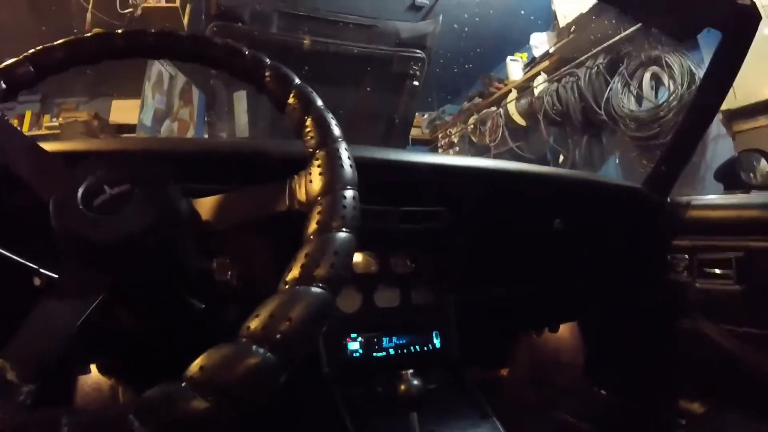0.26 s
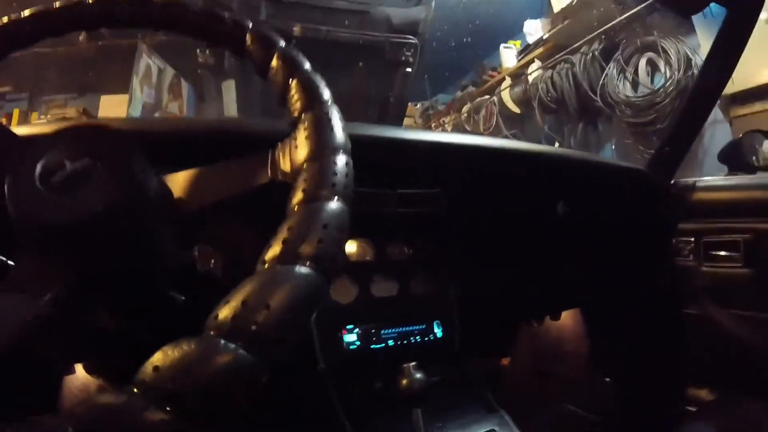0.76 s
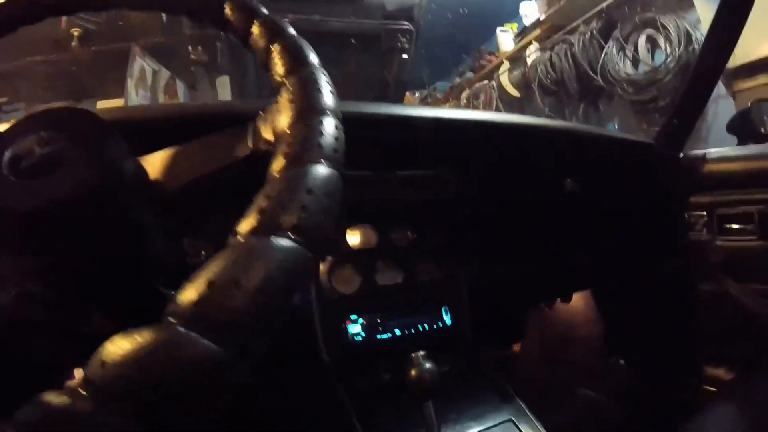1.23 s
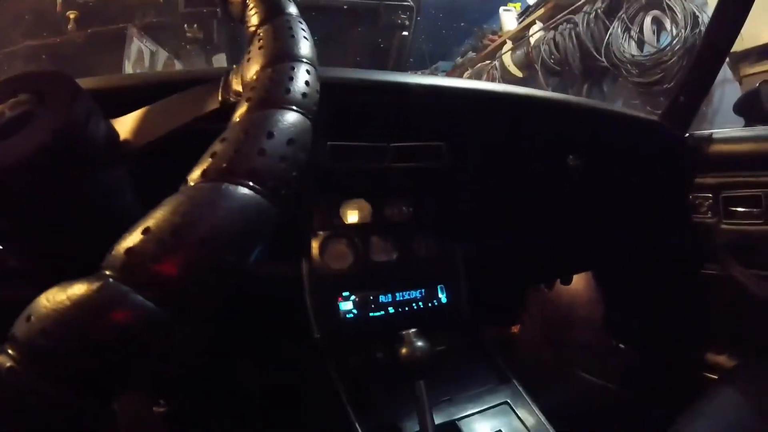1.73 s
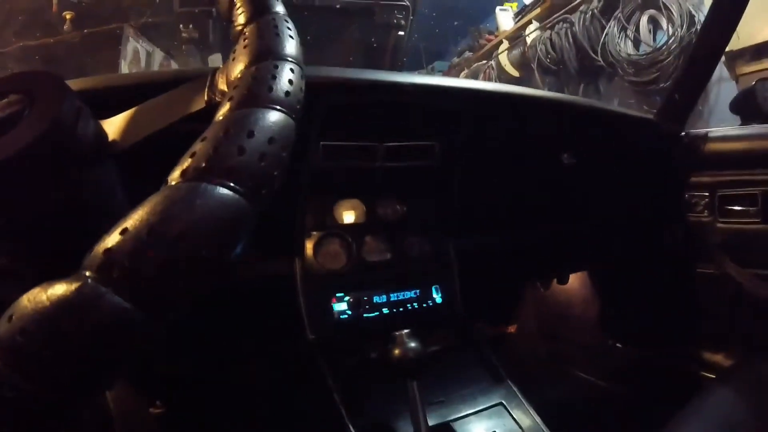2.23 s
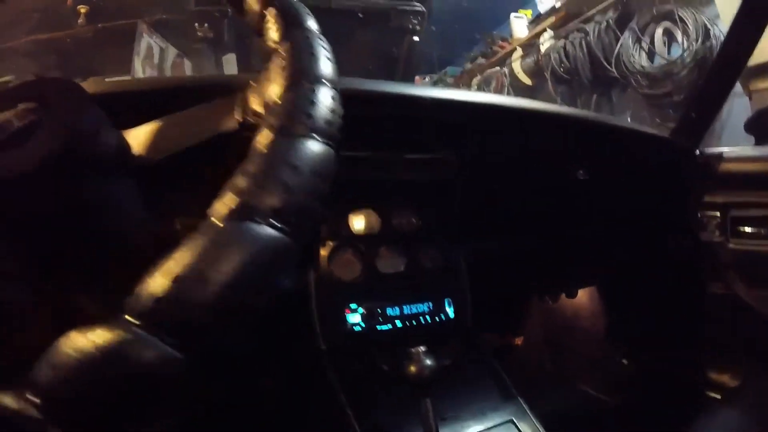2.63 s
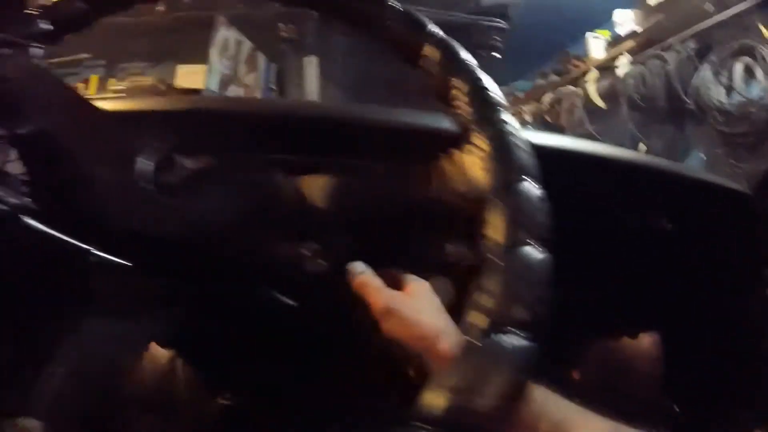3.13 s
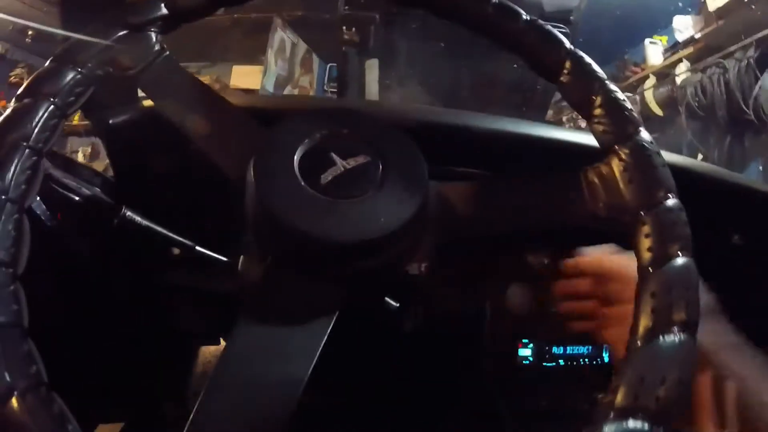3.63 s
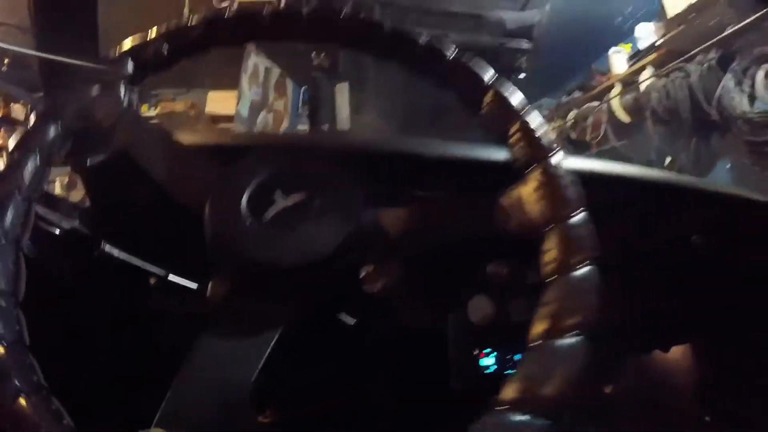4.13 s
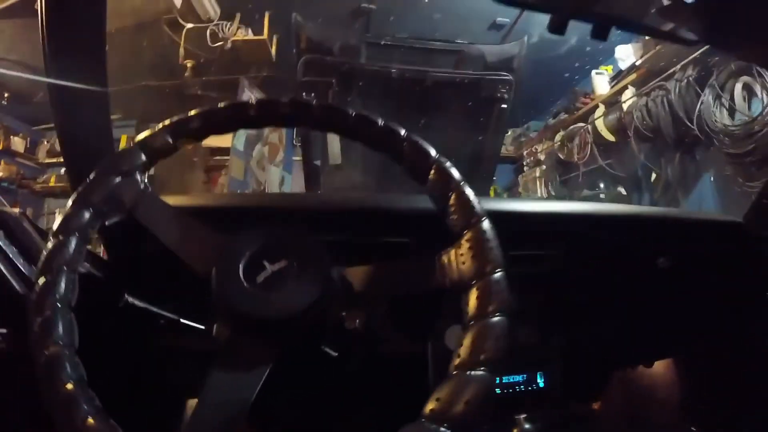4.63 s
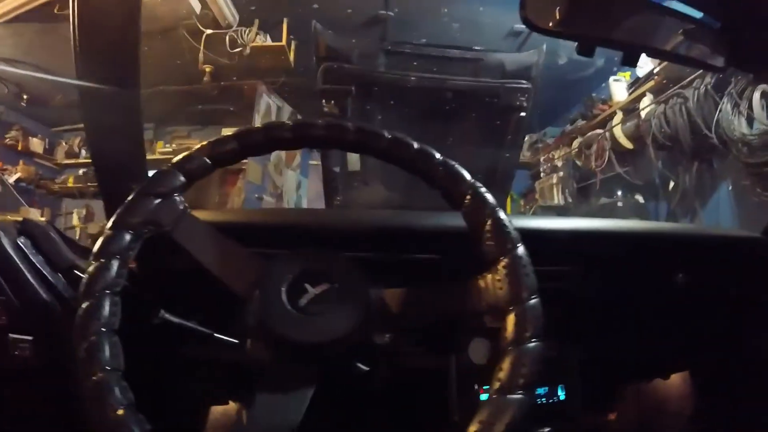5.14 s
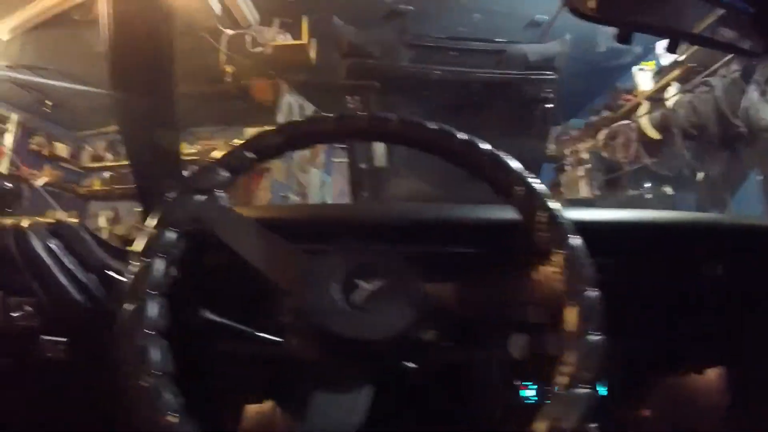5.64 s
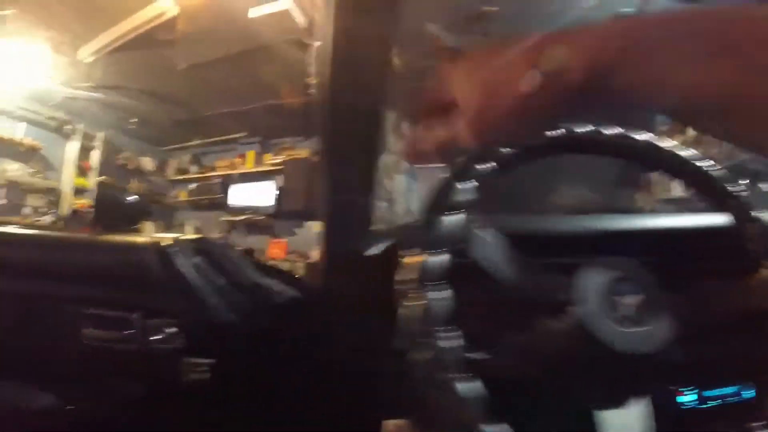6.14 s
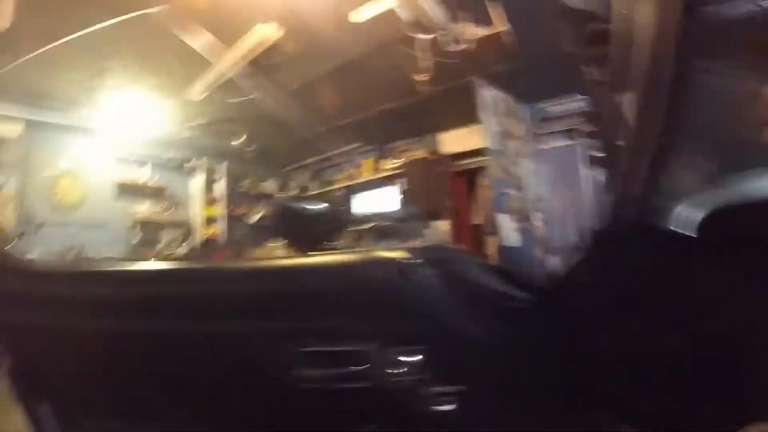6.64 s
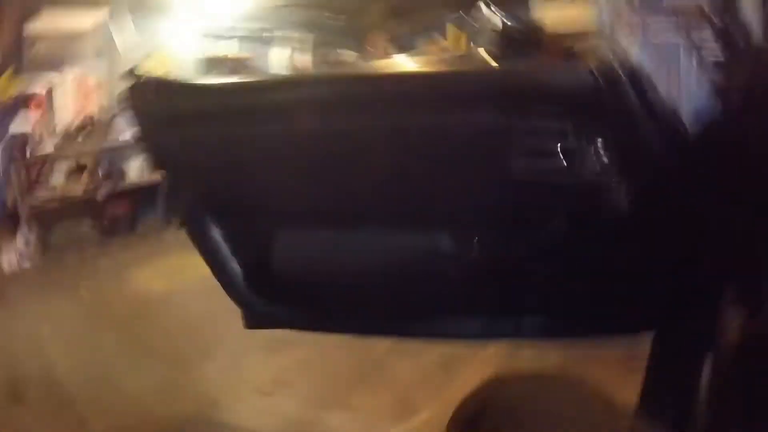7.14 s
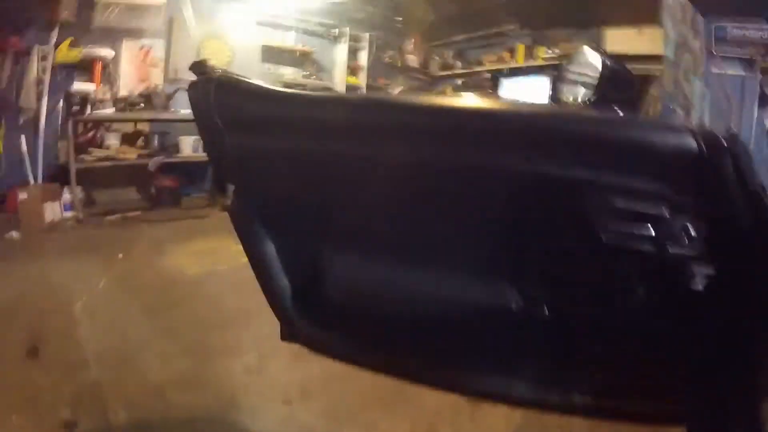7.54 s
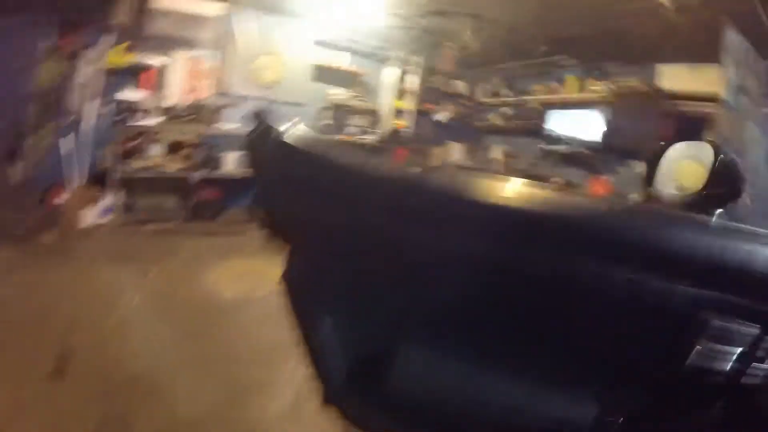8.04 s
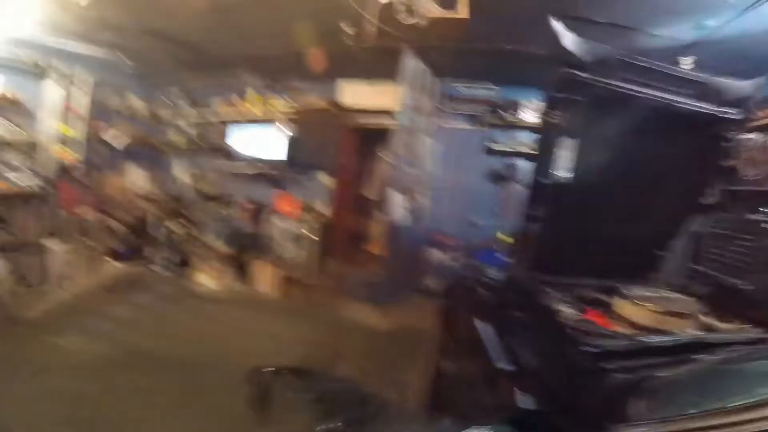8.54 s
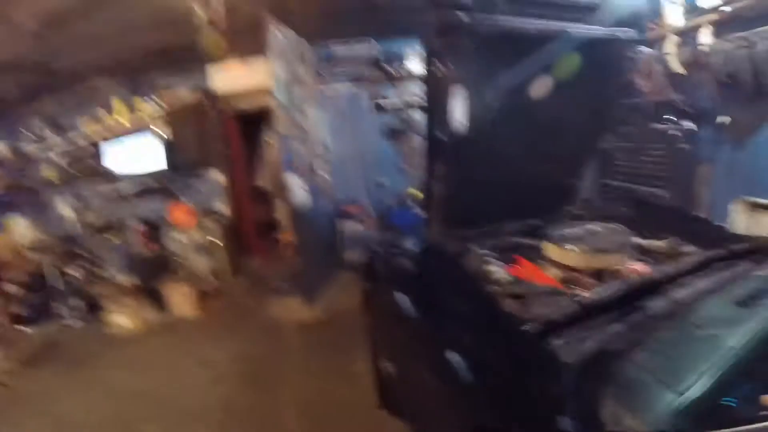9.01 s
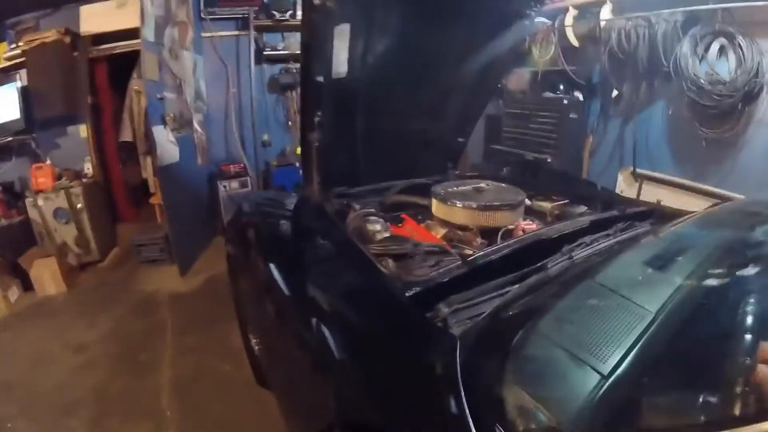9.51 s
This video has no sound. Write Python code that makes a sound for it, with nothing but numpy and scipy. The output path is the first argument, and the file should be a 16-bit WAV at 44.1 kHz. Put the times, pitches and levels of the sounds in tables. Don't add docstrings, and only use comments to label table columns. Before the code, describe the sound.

A large eight-cylinder engine idles from first moment to last, never revving, about 44 firings a second. From 0 to 6 seconds it is heard from the driver's seat: a strong low drone around 87 hertz fills the cabin, with deep throbbing beneath, a little growl, and soft broadband hiss from the engine bay. Weak firings dip the boom several times a second up to about 1.3 s; it is smoother around 1.5 to 2.7 s, then stumbles again, deepest near 3.2 to 3.5 s. Around 6.7 s the door opens, the growl gusts briefly and the sound grows looser. From about 8.4 s the listener moves toward the open bonnet; by 9 s the boom has fallen sharply and lopes, while fan rush, intake hiss and fine valve ticking rise close and bright until the end at roughly 9.8 s. Small, treble-peaky microphone, closed garage.

```python
import sys
import numpy as np
from scipy import signal
from scipy.fft import rfft, irfft, next_fast_len
from scipy.io import wavfile
from scipy.ndimage import uniform_filter1d

SR = 44100
rng = np.random.default_rng(int(sys.argv[2]) if len(sys.argv) > 2 else 0)


def volts_from_decibels(level):
    exponent = np.asarray(level, float) / 20
    return 10 ** exponent


def materialize(psi):
    bounded = np.clip(np.atleast_2d(psi).T, -1, 1)
    quanta = np.round(bounded * 32767).astype(np.int16)
    wavfile.write(sys.argv[1], SR, quanta)


N = 430857
TIME = np.arange(N) / SR

# start_s, place
PLACE = [(0, 0.22), (1.2, 0.029), (3.0, 0.14), (4.5, 0.15), (5.2, 0.47), (5.8, 0.4), (6.2, 1.44),
         (6.8, 0.67), (7.3, 1.15), (8.3, 0.73), (8.6, 1.5), (8.9, 2.3), (9.3, 2.05), (9.77, 2.05)]

# start_s, level_db, extra_low_db
BAY_PATH = [(0.0, 2.5, 2), (0.8, 1, 0.5), (1.2, 0, 2.5), (1.45, -2, -0.5), (2.0, -1.5, -0.5), (3.0, -3, -1),
            (3.6, -1, 0.5), (4.2, -1, 1), (5.0, 1.5, -0.5), (5.6, 2, 0.5), (6.0, 1, 1), (6.75, 2.5, -1.5),
            (7.2, -0.5, -1), (8.1, 0, -1.5), (8.4, 1, -1), (8.6, 1.5, 2.5), (9.1, 5, 0.5), (9.5, 7, 0),
            (9.77, 9, 0.5)]
BAY_FOLLOWS = (0.69, 1, 1)
BAY_CENTRES_HZ = (470, 1250, 4500)
# pitch_hz, level_db (per Hz)
BAY_COLOUR = [(120, -29.5), (200, -0.5), (230, -16), (270, -10.5), (310, -13.5), (357, -11), (516, -13),
              (637, -16.5), (1290, -23.5), (1830, -24), (2510, -24.5), (5930, -33), (6590, -33),
              (11200, -53.5), (13500, -73)]
# pitch_hz, width_hz, level_db
INTAKE = (1240, 420, 8.3)
# pitch_hz, width_hz, level_db
BONNET_RINGS = [(2200, 280, -19), (5370, 350, -11)]

# start_s, firings_per_s
IDLE_SPEED = [(0.0, 44.23), (0.42, 45.08), (0.8, 44.82), (1.16, 45.34), (1.39, 43.74), (1.76, 45.57),
              (2.1, 44.05), (2.48, 44.74), (2.74, 44.66), (3.33, 44.13), (3.44, 44.74), (3.99, 44.1),
              (4.25, 43.45), (4.49, 44.62), (5.14, 43.49), (5.4, 45.16), (5.63, 42.79), (6.04, 44.12),
              (6.59, 44.06), (6.71, 43.53), (7.27, 43.75), (7.38, 44.43), (7.75, 43.82), (8.4, 43.09),
              (8.9, 42.9), (9.19, 43.27), (9.77, 43.75)]
CYLINDER_DB = [3.5, 0, 1.5, 0, 2.5, -2, 1.74, 1.5]
# start_s, level_db
BOOM_LEVEL = [(0.0, -11.5), (0.8, -11), (1.3, -11.5), (2.05, -11), (2.7, -13), (3.4, -12), (3.9, -12),
              (4.8, -14.5), (5.4, -13.5), (5.8, -12), (6.1, -14), (6.9, -11.5), (7.3, -10.5), (8.1, -10.5),
              (8.45, -13.5), (8.8, -22.5), (9.2, -25), (9.77, -23.5)]
# pitch_hz, width_hz, seat_db, door_db, bonnet_db
BOOM = [(66.5, 14.3, -10.5, -13.5, -2), (77.7, 6.7, -10.5, -9.5, -5), (87.1, 8, 0.4, -1.5, -4.5),
        (92.5, 5.6, -16.5, -15, -14.5)]
THROB = [(20, 17, -14, -7, -1), (34.5, 11, -5.5, -10, 2.5), (44.34, 4.6, -5.5, -7, -6),
         (51.8, 2.3, -10.5, -11.5, -19.5)]
GROWL = [(109.2, 8.6, -4, -3, 3), (124, 11, -15.5, -8.5, -11.5), (143.05, 4.3, -5, -5.5, -9.5),
         (152.5, 7.7, -18, -18, -3), (158.3, 14.4, -11, -8, -11), (165.9, 11, -17.5, -9, -16),
         (177, 5.7, -12.5, -12, -23), (200.2, 9.7, -7, -22, -23), (234.5, 15, -23.5, -21, -19.5),
         (267.8, 9.8, -17, -22.5, -15), (286.3, 16, -34, -31.5, -10.5), (358.6, 11, -29, -18, -15),
         (413, 12, -18, -25.5, -27), (519.3, 15, -19, -22, -40)]
EVEN = (1.1, .6, .22)
ROUGH = (.13, .45, .16)
GROWL_ROUGHER = (1.0, 1.6, .8)
# centre_s, level_db, wave_lead_ms
WEAK_FIRINGS = [(.25, -4, 0.7), (.445, -3.5, 1), (.59, -3, 0.49), (.771, -6, 1.3), (.95, -1.5, 0.62),
                (1.116, -3.5, .3), (1.301, -7, 1.2), (2.84, -4, 0.86), (3.17, -10.5, 1.4), (3.361, -7, .8),
                (3.533, -12, 1.05), (3.718, -7, 0.74), (3.899, -8.5, 1), (4.08, -5, 1.3),
                (4.216, -4.5, 0.71), (4.569, -5.5, 1.8), (4.819, -8, 1.8), (5.17, -5, 1.2), (5.367, -6, .4),
                (5.541, -4, 0.58), (5.738, -7.5, 0.67), (5.99, -4.5, 3.4), (6.175, 0, 1.5), (6.365, 0, 1.8),
                (6.55, 0.5, 0.52), (6.73, -2, 1.1), (7.03, -3.5, 0.59), (7.21, -5.5, .6),
                (7.285, -1.5, 1.2), (7.471, -5, 2), (7.65, -0.5, .8), (7.835, -2.5, 1.1), (8.02, -2, 0.75),
                (8.197, -3.5, 1.9), (8.39, -1, 0.94)]
# centre_s, level_db
SURGES = [(.11, 6.5), (.45, 5.5), (.85, 4), (1.3, 1), (1.62, 0), (1.96, -10.5), (2.25, -4.5), (2.7, 0),
          (3.749, 2), (4.2, 0), (4.51, -2), (4.62, 7.5), (4.92, 5), (5.33, -5), (5.42, 1), (5.74, 2.5),
          (6.0, 6), (6.691, -2), (6.8, 7), (8.15, 3), (8.7, -5), (9.2, -2), (9.72, 4)]

# pitch_hz, width_hz, level_db
CAPSULE = (6570, 140, 6)

TOP_FLICKER_DB, TOP_FROM_HZ = 3, 10000

FIRST_TURN = 1.4
LATE_SHARE = 0.009
SWAY_S = .0002

LOPE_DB, LOPE_PEAK = (0.7, 2, 6.5), 0.75
THROB_LOPE_DB, THROB_PEAK = 0.5, 0.2
GROWL_LOPE_DB, GROWL_PEAK = 1.5, .02

THROB_SHUT_DB, DOOR_LEAK_DB, DOOR_OPENS_S, DOOR_SWING_S = -19, -8.5, 6.9, .5
THROB_NULL_DB, THROB_NULL_S, THROB_NULL_WIDTH_S = -6.5, 9.6, 0.27
SURGE_S = 0.085

GROWL_DB, GROWL_FOLLOWS = -27, 0.43
DOOR_GUST_DB, DOOR_GUST_AT_S, DOOR_GUST_S = 5, 6.74, 0.34

WEAK_S, THROB_HOLE_SHARE = 0.028, 0.16
LEAD_AFTER_S, LEAD_RISE_S, LEAD_FALL_S = .018, .022, .055


def unit(x):
    return x / np.sqrt(np.mean(x ** 2))


def curves(table):
    start_s, *columns = np.transpose(table)
    return [np.interp(TIME, start_s, column) for column in columns]


def by_place(values):
    return np.interp(curves(PLACE)[0].clip(0, 2), range(3), values)


def bump(centre_s, width_s):
    return np.exp(-((TIME - centre_s) / width_s) ** 2)


def ring(x, hz, width_hz, lead):
    b, a = signal.iirpeak(hz, hz / width_hz, fs=SR)
    return signal.lfilter(b, a, np.r_[x[:lead], x])[lead:]


def walk(rate):
    hold = int(SR / rate)
    levels = rng.standard_normal(N // 100)[:N // hold + 1]
    drift = uniform_filter1d(np.repeat(levels, hold), hold)
    return unit(uniform_filter1d(drift, hold)[:N])


def clicks(turns, sizes, late):
    k = np.arange(int(turns[0] + 1), int(turns[-1]))
    at = np.interp(k + late[k], turns, np.arange(N - 0.)).clip(0, N - 2)
    whole = at.astype(int)
    out = np.zeros(N)
    np.add.at(out, whole, sizes[k] * (1 - at + whole))
    np.add.at(out, whole + 1, sizes[k] * (at - whole))
    return out


def firing_count():
    return np.cumsum(curves(IDLE_SPEED)[0]) / SR


def valve_ticks(turns, decay_s=.003):
    chance = rng.standard_normal((N // 200, 2)).T
    ticks = clicks(2 * turns, volts_from_decibels(6.0 * chance[0]), 0.11 * chance[1])
    return unit(signal.lfilter([1], [1, -np.exp(-1 / (decay_s * SR))], ticks))


def engine_bay(turns, swell_db=.15, flicker_db=.75, tick_share=.07):
    ticks = valve_ticks(turns)
    size = next_fast_len(N)
    f = np.fft.rfftfreq(size, 1 / SR) + 1
    colour_hz, colour_db = np.transpose(BAY_COLOUR)
    colour = volts_from_decibels(np.interp(np.log(f), np.log(colour_hz), colour_db, left=-90, right=-90))
    hz, width, db = INTAKE
    colour = colour * volts_from_decibels(db / (1 + (2 * (f - hz) / width) ** 2))
    source = rfft(rng.standard_normal(size)) * colour

    path_db, low_db = curves(BAY_PATH)
    moves = [follow * path_db + low * low_db for follow, low in zip(BAY_FOLLOWS, (1, 0, 0))]
    swell = swell_db * walk(14)
    out = 0
    for octave in np.arange(7.5, 14.5, .5):
        band = irfft(source * (1 - 2 * abs(np.log2(f) - octave)).clip(0), size)[:N]
        share = [np.interp(octave, np.log2(BAY_CENTRES_HZ), row) for row in np.eye(3)]
        ticking = 1 - share[2] * tick_share * (1 - ticks)
        flutter_db = flicker_db + TOP_FLICKER_DB * np.clip(octave - np.log2(TOP_FROM_HZ), 0, 1)
        out = out + band * ticking * volts_from_decibels(np.dot(share, moves) + swell + flutter_db * walk(12))

    close = (curves(PLACE)[0] - 1).clip(0, 1)
    rings = sum(volts_from_decibels(8 + db) * ring(out, hz, width, SR) for hz, width, db in BONNET_RINGS)
    return unit(out + close * rings) * volts_from_decibels(-31.5)


def exhaust_levels():
    holes_db = sum(db * bump(s, WEAK_S) for s, db, _ in WEAK_FIRINGS)
    boom_db = curves(BOOM_LEVEL)[0] + holes_db

    door = np.clip((TIME - DOOR_OPENS_S) / DOOR_SWING_S + .5, 0, 1)
    throb_db = THROB_SHUT_DB + DOOR_LEAK_DB * door
    throb_db = throb_db + THROB_NULL_DB * bump(THROB_NULL_S, THROB_NULL_WIDTH_S)
    throb_db = throb_db + THROB_HOLE_SHARE * holes_db
    throb_db = throb_db + sum(db * bump(s, SURGE_S) for s, db in SURGES)

    growl_db = GROWL_DB + GROWL_FOLLOWS * sum(curves(BAY_PATH))
    growl_db = growl_db + DOOR_GUST_DB * bump(DOOR_GUST_AT_S, DOOR_GUST_S)
    return boom_db, throb_db, growl_db


def exhaust(turns):
    strength_chance, late_chance = rng.standard_normal((N // 500, 2)).T.clip(-1.5, 1.5)
    pattern = volts_from_decibels(np.resize(CYLINDER_DB, len(strength_chance)))
    average = np.full_like(pattern, pattern.mean())
    parts = (pattern - average, average, pattern * strength_chance)
    differences, mean, uneven = (clicks(turns + FIRST_TURN, p, LATE_SHARE * late_chance) for p in parts)

    cycle = turns / len(CYLINDER_DB)
    lead = np.searchsorted(cycle, 5)
    boom_db, throb_db, growl_db = exhaust_levels()
    boom_db = boom_db + by_place(LOPE_DB) * np.cos(2 * np.pi * (cycle - LOPE_PEAK))
    throb_db = throb_db + THROB_LOPE_DB * np.cos(2 * np.pi * (cycle - THROB_PEAK))
    growl_db = growl_db + GROWL_LOPE_DB * np.cos(2 * np.pi * (cycle - GROWL_PEAK))

    groups = (BOOM, THROB, GROWL)
    levels_db = (boom_db, throb_db, growl_db)
    rougher = (1, 1, by_place(GROWL_ROUGHER))
    out = 0
    for group, group_db, even, rough, more in zip(groups, levels_db, EVEN, ROUGH, rougher):
        pulses = differences + even * mean + rough * uneven * more
        for k, (hz, width, *place_db) in enumerate(group):
            mode = unit(ring(ring(pulses, hz, width, lead), hz, width, lead))
            out = out + (-1) ** k * mode * volts_from_decibels(group_db + by_place(place_db))
    return out


def wave_lead_s():
    lead_ms = 0
    for centre_s, _, ms in WEAK_FIRINGS:
        after = TIME - (centre_s + LEAD_AFTER_S)
        slope_s = np.where(after < 0, LEAD_RISE_S, LEAD_FALL_S)
        lead_ms = lead_ms + ms * np.exp(-(after / slope_s) ** 2)
    return lead_ms / 1000


def scene():
    turns = firing_count()
    pipes = exhaust(turns)
    hiss = engine_bay(turns)
    swayed = np.interp(TIME + SWAY_S * walk(12) + wave_lead_s(), TIME, pipes)
    return (swayed + hiss)[None]


def roll_off(x):
    return signal.sosfilt(signal.butter(12, 13450, fs=SR, output="sos"), x)


def record(dry):
    hz, width, db = CAPSULE
    x = dry[0] + (volts_from_decibels(db) - 1) * ring(dry[0], hz, width, SR)
    x = signal.sosfilt(signal.butter(2, 12, "high", fs=SR, output="sos"), x)[None]
    mix = x / (1 + abs(x / .82) ** 5) ** (1 / 5)
    return roll_off(mix)


dry = scene()
out = record(dry)
materialize(out)
```